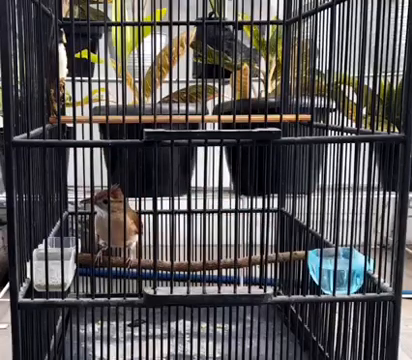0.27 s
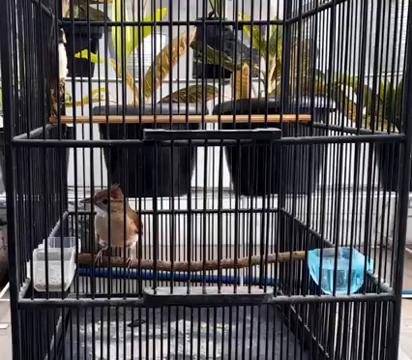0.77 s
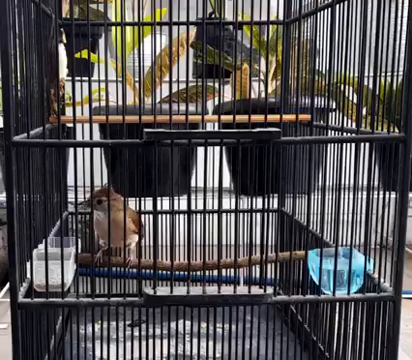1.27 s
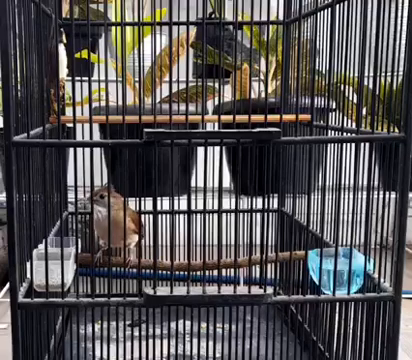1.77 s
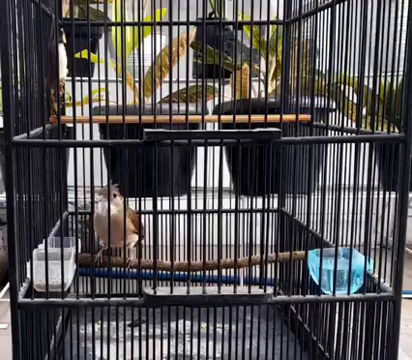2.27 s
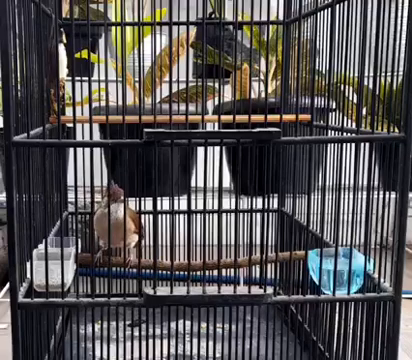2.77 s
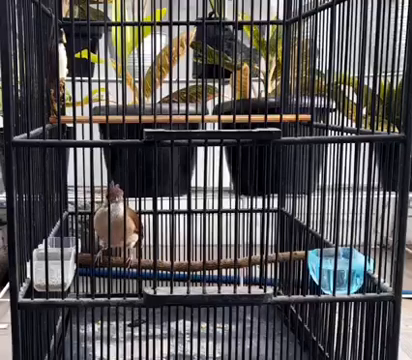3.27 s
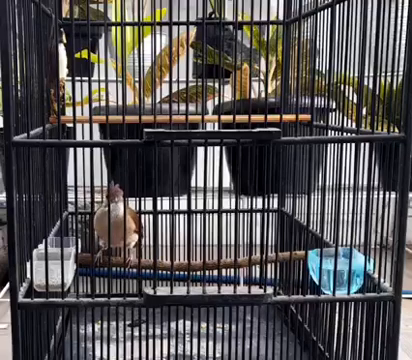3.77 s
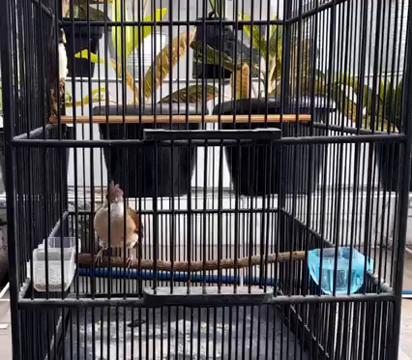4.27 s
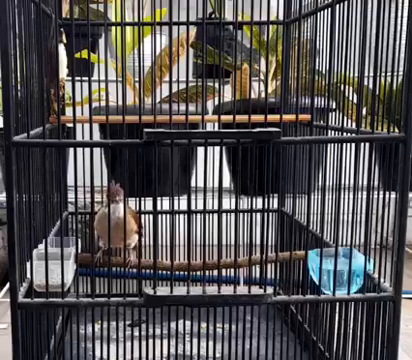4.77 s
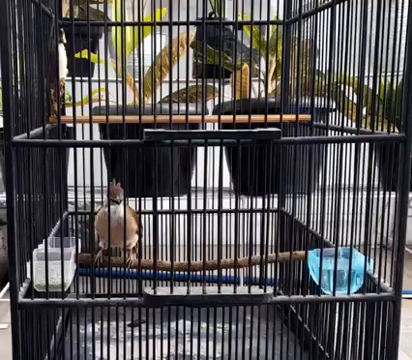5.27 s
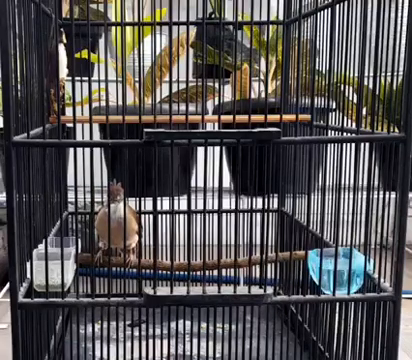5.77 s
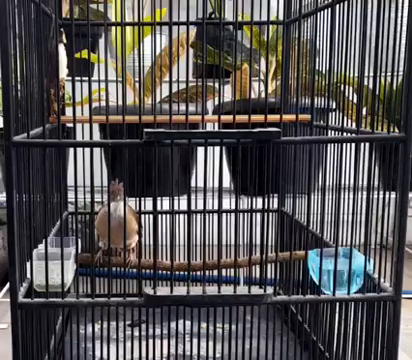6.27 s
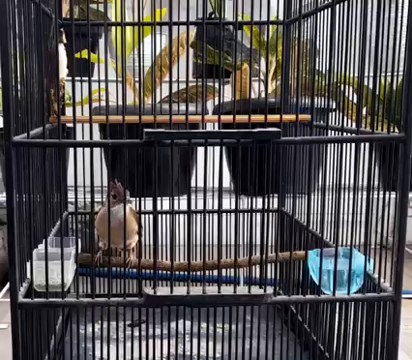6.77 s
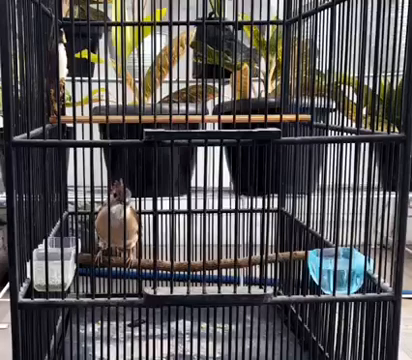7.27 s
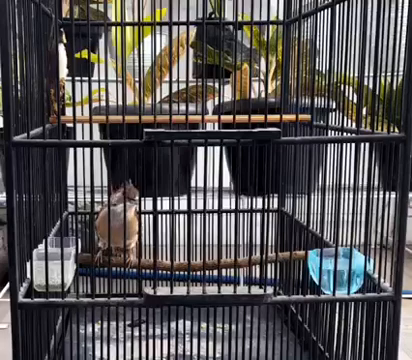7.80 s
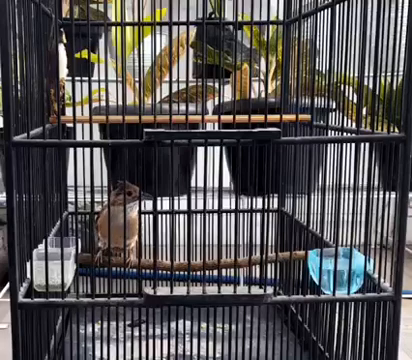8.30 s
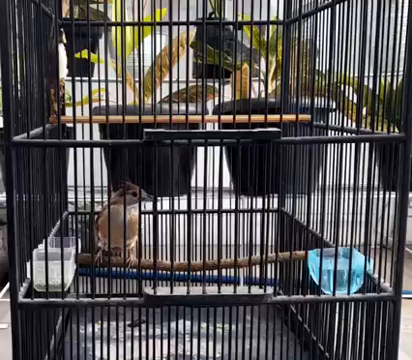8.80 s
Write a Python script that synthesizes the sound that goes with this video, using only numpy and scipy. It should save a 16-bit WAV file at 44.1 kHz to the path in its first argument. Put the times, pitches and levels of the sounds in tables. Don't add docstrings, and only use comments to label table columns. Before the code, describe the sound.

A caged bird whistles short falling notes on an echoing porch while a second bird trills and slides behind, over a low motor hum.

```python
import sys
import numpy as np
from scipy import signal
from scipy.fft import rfft, irfft, next_fast_len
from scipy.io import wavfile
from scipy.ndimage import uniform_filter1d

SR = 44100
rng = np.random.default_rng(int(sys.argv[2]) if len(sys.argv) > 2 else 0)


def store_pcm(level_fs):
    pcm = np.round(np.clip(level_fs, -1, 1) * 32767).astype(np.int16)
    wavfile.write(sys.argv[1], SR, np.atleast_2d(pcm).T)


def makeup_ratio(level_db):
    decades = np.asarray(level_db, float) / 20
    return 10 ** decades


N = 398663

QUICK_S, UNHURRIED_S = .031, .04
SNAP_S = .011


def at_hz(points, hz):
    table_hz, values = np.transpose(points)
    return np.interp(np.log(hz), np.log(table_hz), values)


def in_time(rows):
    s, *columns = np.transpose(rows)
    return [np.interp(np.arange(N) / SR, s, column) for column in columns]


def rms_one(x):
    return x / np.sqrt(np.mean(x ** 2) + 1e-20)


def band(x, low_hz, high_hz, order=2):
    return signal.sosfilt(signal.butter(order, [low_hz, high_hz], "band", fs=SR, output="sos"), x)


def high_pass(x, order, cutoff_hz):
    return signal.sosfilt(signal.butter(order, cutoff_hz, "high", fs=SR, output="sos"), x)


def shape_spectrum(x, gain_at):
    size = next_fast_len(N)
    gain = gain_at(np.fft.rfftfreq(size, 1 / SR))
    return irfft(rfft(x, size) * gain, size)[:, :N]


def drift(rate_hz):
    pole = np.exp(-80 * np.pi * rate_hz / SR)
    noise = rng.standard_normal(N // 40 + 2002)
    slow = signal.lfilter([1], [1, -2 * pole, pole * pole], noise)[2000:]
    return np.interp(np.arange(N) / 40, np.arange(len(slow)), rms_one(slow))


def add(out, s, sound):
    i = round(s * SR)
    out[i:i + len(sound)] += sound[:N - i]


def whistle(hz, db, octave_db):
    phase = 2 * np.pi * np.cumsum(hz) / SR
    return makeup_ratio(db) * (np.sin(phase) + makeup_ratio(octave_db) * np.sin(2 * phase))


def near_note(top_hz, end_hz, fall, hold, db):
    # f/Hz, width/Hz, level/dB
    resonances = [(2780, 200, 5), (3050, 250, 2), (3350, 130, -13), (3580, 180, 10)]
    release = .016
    t = np.arange(-SNAP_S, fall + hold + release, 1 / SR)
    linger = np.interp(top_hz, [3050, 3600], [1.0, .62])
    glide = np.cos(np.pi / 2 * np.clip(t / fall, 0, 1) ** linger) ** 2
    hook_hz = top_hz * (1 - .8 * (np.abs(t) / SNAP_S) ** 1.6)
    hz = np.where(t < 0, hook_hz, end_hz + (top_hz - end_hz) * glide)

    end_db = np.interp(fall, [QUICK_S, UNHURRIED_S], [-12.5, -4.5])
    moments = [-SNAP_S, -.008, -.005, -.002, fall * .55, fall, fall + hold, fall + hold + release]
    effort = np.interp(t, moments, [-42, -17, -12, -4.5, 0, end_db, end_db + 0.5, -36])
    throat = sum(gain_db / (1 + (2 * (hz - mode_hz) / width) ** 2) for mode_hz, width, gain_db in resonances)
    octave_db = np.interp(t, [-.007, -.004], [-3, -33])
    return whistle(hz, db + effort + throat, octave_db)


def near_bird():
    # t/s at top, top f/Hz, fall t/s, level/dB
    slow_phrase = [
        (0.984, 3430, 0.041, -24),
        (1.16, 3250, 0.043, -20.5),
        (1.345, 3320, 0.038, -17),
        (1.563, 3243, 0.036, -18),
        (1.777, 3210, 0.036, -17),
        (1.98, 3080, 0.038, -19.5),
        (2.196, 3030, 0.039, -18.5),
        (2.413, 3046, 0.039, -17),
        (2.618, 3130, 0.039, -18),
    ]
    fast_phrase = [(4.369, 3180, 0.039, -22), (4.524, 3414, 0.036, -17.5), (4.66, 3200, 0.026, -17),
                   (4.759, 3530, 0.029, -16.5), (4.855, 3620, 0.02, -16.5), (4.951, 3620, 0.021, -16.5),
                   (5.046, 3710, 0.025, -17), (5.143, 3620, 0.027, -16), (5.244, 3620, 0.021, -16),
                   (5.342, 3620, 0.026, -16), (5.446, 3670, 0.029, -17.5), (5.551, 3696, 0.025, -17),
                   (5.656, 3566, 0.026, -14.5), (5.76, 3597, 0.028, -16.5), (5.872, 3567, 0.028, -15),
                   (5.999, 3510, 0.033, -15), (6.156, 3250, 0.033, -16)]
    last_phrase = [
        (6.863, 3315, 0.033, -18.5),
        (7.079, 3080, 0.039, -17),
        (7.284, 3060, .042, -17.5),
        (7.479, 3038, 0.036, -14.5),
        (7.635, 3065, .046, -17),
        (7.824, 3087, 0.04, -16),
        (8.036, 3156, .044, -16),
    ]
    # first f/Hz, last f/Hz
    bottom_hz = [
        (2390, 2320),
        (2215, 2400),
        (2310, 2375),
    ]
    out = np.zeros(N)
    for phrase, bottoms in zip((slow_phrase, fast_phrase, last_phrase), bottom_hz):
        landings_hz = np.linspace(*bottoms, len(phrase))
        for (s, top_hz, fall, db), end_hz in zip(phrase, landings_hz):
            hold = np.interp(fall, [QUICK_S, UNHURRIED_S], [.003, .017])
            if s == phrase[0][0]:
                hold += .017
            add(out, s - SNAP_S, near_note(top_hz, end_hz, fall, hold, db - 0.5))
            rasp = band(rng.standard_normal(1100), 1100, 4000) * np.hanning(1100)
            add(out, s - .024, makeup_ratio(db - 10.5) * rasp)
    return out


def even_run(first_s, gap_s, db, shortfall_db, count):
    return [(first_s + k * gap_s, db + shortfall_db * 0.33 ** k) for k in range(count)]


def second_bird():
    # t/s from start, f/Hz, level/dB
    drop = [(0, 6946, -2), (.008, 6350, -0.5), (.022, 5205, 1), (.04, 4600, 0), (.058, 3875, -13.5)]
    lift = [(0, 2770, -12), (.02, 3300, 1.5), (.05, 4030, 1), (.07, 4400, -5), (.08, 4750, -42)]
    trill = [(0, 6800, -5), (.005, 6200, 2), (.015, 5200, 0), (.021, 4700, -6), (.027, 4250, -2),
             (.036, 3700, 1.5), (.046, 3200, 0), (.053, 2950, -15)]
    slide = [(0, 6987, -3), (.015, 6932, -4), (.05, 6676, -7), (.11, 5250, -8.5), (.15, 4853, -1),
             (.19, 3963, -3), (.22, 3078, -5), (.245, 2940, -17), (.27, 3280, -32.5)]
    rise = [(0, 2500, -16), (.015, 2750, -4), (.035, 3200, 0), (.052, 3550, 0), (.066, 3600, -22)]
    # t/s, level/dB
    slides = [
        (7.145, -23),
        (7.428, -24.5),
        (7.692, -23.5),
        (7.966, -23.5),
        (8.248, -23.5),
    ]
    rises = [
        (8.589, -34),
        (8.719, -33.5),
        (8.855, -33),
        (8.994, -33),
    ]
    drops = even_run(4.344, .172, -25.5, -28.5, count=10)
    lifts = even_run(4.596, .1717, -30.5, -0.5, count=8)
    trills = even_run(5.977, .0739, -29.5, 0, count=16)
    # shape, run, octave level/dB
    song = ((drop, drops, -60), (lift, lifts, -40), (trill, trills, -60), (slide, slides, -60), (rise, rises, -16))
    out = np.zeros(N)
    for shape, sung, octave_db in song:
        s, hz, db = np.transpose(shape)
        t = np.arange(0, s[-1], 1 / SR)
        pitch, level = np.interp(t, s, hz), np.interp(t, s, db)
        for (start, level_db), change in zip(sung, rng.normal(0, 0.01, len(sung))):
            add(out, start, whistle(pitch * (1 + change), level + level_db, octave_db))
    return out * makeup_ratio(3.5 * drift(270))


def squawk():
    # t/s, f/Hz, level/dB, roughness/1
    cry = [
        (0, 1461, -19.5, 0.18),
        (.06, 1420, -29.5, 0.27),
        (.1, 1430, -61, 0.1),
        (.2, 1441, -32, 1.16),
        (.29, 1450, -25.5, 0.89),
        (.33, 1493, -31, 0.25),
        (.4, 1453, -24, .14),
        (.47, 1433, -35, 0.14),
        (.72, 1448, -58.5, 0.1),
    ]
    # multiple/1, level/dB
    partials = [(2, -12), (3, -23), (4, 0), (5, -11)]
    hz, db, rough = in_time(cry)
    phase = 2 * np.pi * np.cumsum(hz * (1 + 0.172 * rough * drift(370))) / SR
    sounding = np.arange(N) < cry[-1][0] * SR
    return makeup_ratio(db) * sounding * sum(makeup_ratio(gain_db) * np.sin(k * phase) for k, gain_db in partials)


def far_birds():
    # t/s, length t/s, low f/Hz, high f/Hz, level/dB
    chatter = [(1.063, 0.021, 3550, 4010, -32.5), (1.072, 0.12, 3700, 6640, -39),
               (1.085, 0.023, 4620, 5120, -32), (1.751, 0.63, 5540, 7130, -50.5),
               (3.321, 0.025, 3210, 3630, -47), (3.324, 0.025, 6130, 7160, -50),
               (3.355, 0.034, 4220, 4560, -48), (3.418, 0.16, 6460, 6690, -54),
               (3.612, 0.027, 5660, 6300, -43.5), (4.517, 0.12, 1170, 1288, -35.5),
               (4.522, 0.28, 1620, 2185, -40.5), (4.731, 0.17, 4620, 7000, -34.5),
               (2.4, 0.37, 3960, 6530, -57.5), (8.716, 0.31, 1850, 2590, -51.5),
               (8.531, 0.0084, 5050, 6500, -33), (8.648, 0.035, 4800, 6700, -41.5),
               (8.733, 0.087, 4530, 7240, -34), (8.838, 0.12, 4040, 7150, -33.5)]
    # t/s, length t/s, f/Hz, level/dB
    coos = [
        (0.977, 0.11, 530, -81),
        (1.846, 0.21, 455.7, -40.5),
        (2.385, 0.12, 581, -54),
        (6.251, 0.23, 452, -50.5),
    ]
    out = np.zeros(N)
    for s, length, low_hz, high_hz, db in chatter:
        n = round(length * SR)
        noise = rms_one(band(rng.standard_normal(30000), low_hz, high_hz, order=3))
        add(out, s, makeup_ratio(db) * noise[2000:2000 + n] * np.hanning(n) ** .5)
    for s, length, hz, db in coos:
        n = round(length * SR)
        add(out, s, whistle(np.full(n, hz), db, octave_db=-35) * np.hanning(n) ** .5)
    return out


def porch(x, wet_db, echo_db, direct_db, pan_db, onset):
    # delay t/s, level/dB
    wall_echoes = [
        (.004, -12),
        (.009, -13),
        (.0165, -8),
        (.026, -13),
        (.04, -14),
    ]
    t60_s = 0.51
    t = np.arange(round(1.2 * SR)) / SR
    lumps = makeup_ratio(2.2 * rng.standard_normal((2, len(t) // 128 + 1))).repeat(128, axis=1)[:, :len(t)]
    decay = makeup_ratio(-60 * t / t60_s) * (1 - np.exp(-t / onset))
    tail = rng.standard_normal((2, len(t))) * lumps * decay
    response = makeup_ratio(wet_db) * tail / np.sqrt(np.sum(tail ** 2, axis=1, keepdims=True))
    response[[0, 1], [0, 2]] += makeup_ratio(direct_db)
    skews = rng.uniform(-.0004, .0004, (len(wall_echoes), 2))
    for (s, db), skew in zip(wall_echoes, skews):
        response[[0, 1], ((s + skew) * SR).astype(int)] += makeup_ratio(db + echo_db)
    pan = makeup_ratio(np.array([[pan_db], [-pan_db]]) / 2)
    return signal.fftconvolve(x[None], response * pan, axes=1)[:, :N]


def motor():
    # multiple/1, level/dB
    orders = [(1, -64), (2, -18), (3, -25.5), (4, -52), (5, 3), (6, 1.5), (7, -9), (8, -1.5), (9, 3),
              (10, -3), (11, -7), (12, -26), (13, -42), (14, -11.5), (15, -54.5), (16, -64), (17, -3.5),
              (18, -2), (19, -0.5), (20, -6.5), (21, -13.5), (22, -16.5), (23, 1), (24, -21), (25, -35),
              (26, -14), (27, -17)]
    firing_hz = 13.82 * (1 + 0.0017 * drift(0.41))
    turns = 2 * np.pi * np.cumsum(firing_hz) / SR
    tone = 0
    for k, db in orders:
        tone = tone + makeup_ratio(db + 2.0 * drift(2.9)) * np.sin(k * turns + rng.uniform(0, 2 * np.pi))
    return makeup_ratio(-46) * tone * makeup_ratio(np.array([[-1.3], [1.3]]))


def coloured(spectrum, edges, patchy_db):
    # f/Hz, correlation/1
    likeness = [(60, 1), (250, 0.61), (500, 0.12), (1000, 0.084), (8000, 0.63)]
    # f/Hz, level/dB
    lean_db = [(60, -12.5), (110, 6.5), (200, -3), (380, -2), (700, 0.5), (1290, -1.5), (2380, 1),
               (4400, -1.5), (8120, 3), (15000, 1.5)]
    out, white = 0, rng.standard_normal((2, 2, N))
    for k, (low, high) in enumerate(zip(edges, edges[1:])):
        mid, side = band(white[k % 2], low, high)
        hz = np.sqrt(low * high)
        alike = np.clip(at_hz(likeness, hz), 0, 1)
        lean = makeup_ratio(at_hz(lean_db, hz) / 2 * np.array([[1], [-1]]))
        pair = np.sqrt(1 + alike) * mid + np.sqrt(1 - alike) * side * [[1], [-1]]
        out = out + makeup_ratio(at_hz(spectrum, hz) + patchy_db * drift(5.5)) * lean * pair
    return rms_one(out)


def traffic_air():
    # f/Hz, level/dB per Hz
    air_spectrum = [(15, -64), (25, -50.5), (43, -35), (50, -18.5), (66, -5), (146, -7.5), (209, -13.5),
                    (315, -11), (464, -28), (499, -15.5), (605, -26.5), (1550, -27), (2900, -37),
                    (6760, -36), (8000, -81.5), (10400, -92), (17600, -120)]
    # t/s, level/dB
    swell = [(0.0, -35.5), (0.8, -35), (1.4, -32), (2.8, -35), (3.8, -36), (4.6, -32), (5.8, -37),
             (7.8, -32), (9.04, -39)]
    noise = coloured(air_spectrum, 45 * 2 ** np.arange(0, 7.7, .4), patchy_db=3.0)
    return high_pass(makeup_ratio(in_time(swell)[0] - 5) * noise, 6, 60)


def round_the_wall(x):
    # f/Hz, width/Hz, level/dB
    shadow_dips = [(4650, 300, -8), (1250, 200, -6)]

    def gain_at(hz):
        return makeup_ratio(sum(db / (1 + (2 * (hz - dip_hz) / width) ** 2) for dip_hz, width, db in shadow_dips))

    return shape_spectrum(x, gain_at)


def hiss():
    # f/Hz, level/dB per Hz
    hiss_spectrum = [(8000, -26), (9500, -25), (11000, -17), (12700, -13), (13100, 0), (13900, 0),
                     (14300, -14), (15000, -22), (15600, -35)]
    return makeup_ratio(-60) * coloured(hiss_spectrum, np.geomspace(8000, 15500, 20), patchy_db=1.5)


def whine():
    # t/s, f/Hz, level/dB
    whine_course = [
        (2.38, 13609, -100),
        (2.45, 13609, -59),
        (4.5, 13609, -59),
        (4.7, 13609, -66),
        (5.45, 13609, -59),
        (5.55, 13609, -100),
    ]
    hz, db = in_time(whine_course)
    return whistle(hz, db, octave_db=-200)


def scene():
    near = porch(near_bird(), -4.5, echo_db=0, direct_db=0, pan_db=-1.6, onset=.007)
    distant = second_bird() + squawk() + far_birds()
    far = porch(distant, 3, echo_db=-8.5, direct_db=-3, pan_db=-2.0, onset=0.00057)
    return near + round_the_wall(far + traffic_air()) + motor() + hiss() + whine()


def shifted(x, low_hz, high_hz, up_hz):
    analytic = signal.hilbert(band(x, low_hz, high_hz, order=4), next_fast_len(N))[:, :N]
    return np.real(analytic * np.exp(2j * np.pi * up_hz * np.arange(N) / SR))


def following(x, low_hz, high_hz, size):
    power = uniform_filter1d(band(x, low_hz, high_hz) ** 2, size=size)
    return np.sqrt(power + 1e-12) * rng.standard_normal((2, N))


def masked_lines(x, mask_db, luck_db):
    # f/Hz, against the band level/dB, against the frame level/dB
    thresholds = [(600, -14, -90), (2000, -9, -80), (3500, -4, -68), (7000, -2, -58), (7700, -1, -44),
                  (9400, -1, -48), (11000, 0, -56), (15000, 0, -54)]
    hz, _, lines = signal.stft(x, SR, window="cosine", nperseg=2048)
    power = uniform_filter1d(np.abs(lines) ** 2, size=13, axis=1)[:, 6::12]
    spread = uniform_filter1d(power, size=13, axis=1)
    frame = power[:, 8:].sum(axis=1, keepdims=True)
    table_hz, *steps = np.transpose(thresholds)
    step_db, frame_db = (np.interp(hz[6::12], table_hz, s)[:, None] for s in steps)

    luck = uniform_filter1d(rng.standard_normal(power.shape[1:]), size=2, axis=1) * np.sqrt(2)
    floor = power * makeup_ratio(2 * step_db) + spread * makeup_ratio(2 * mask_db) + frame * makeup_ratio(2 * frame_db)
    step = np.sqrt(floor) * makeup_ratio(luck_db * luck)
    step = step[:, np.minimum(np.arange(len(hz)) // 12, power.shape[1] - 1)]
    keep = (np.abs(lines) > step) | (hz < 600)[:, None]
    return signal.istft(lines * keep, SR, window="cosine", nperseg=2048)[1][:, :N]


def low_pass(x):
    return signal.sosfilt(signal.butter(12, 15830, fs=SR, output="sos"), x)


def record(dry):
    # f/Hz, level/dB
    treble_db = [(9000, -25.5), (9800, -14.5), (11000, -13), (12500, -17), (14300, -12), (14900, -61)]
    kept = signal.sosfilt(signal.cheby2(12, 45, 7500, fs=SR, output="sos"), dry)
    quiet_top = high_pass(dry, 6, 8200)
    fill = makeup_ratio(-14) * shifted(dry, 3000, 9100, up_hz=7415) + following(kept, 3980, 11000, size=500)
    rebuilt = shape_spectrum(fill, lambda hz: makeup_ratio(at_hz(treble_db, hz + 1)))
    rebuilt = band(rebuilt, 8800, 14800, order=6)
    last = band(following(dry, 2200, 3200, size=1200), 15150, 15750, order=5)
    whole = kept + quiet_top + rebuilt + makeup_ratio(-14.0) * last
    return low_pass(masked_lines(whole, mask_db=-20, luck_db=4))


dry = scene()
out = record(dry)
store_pcm(out)
```